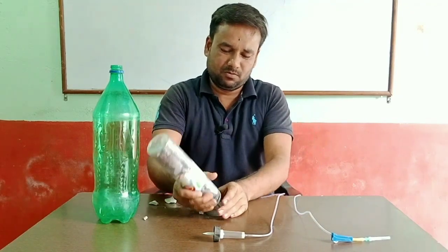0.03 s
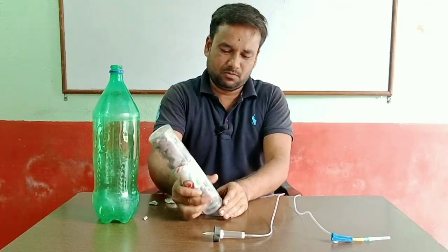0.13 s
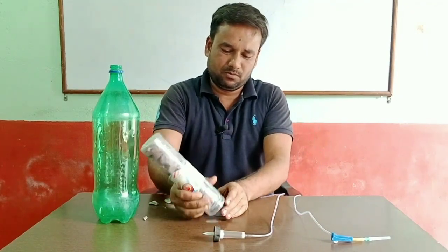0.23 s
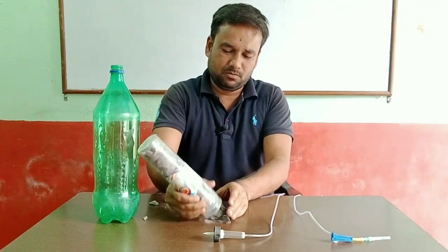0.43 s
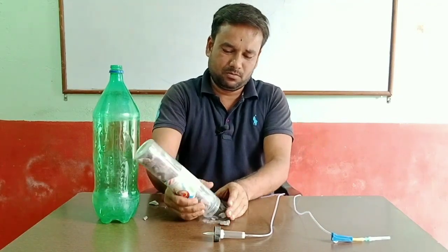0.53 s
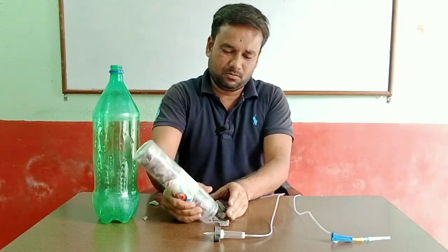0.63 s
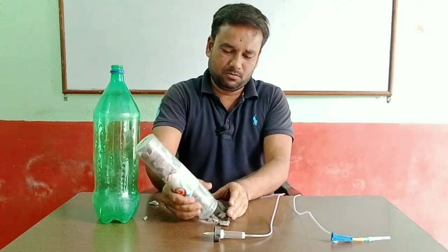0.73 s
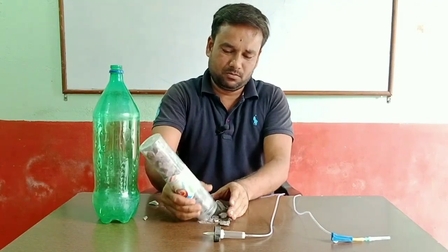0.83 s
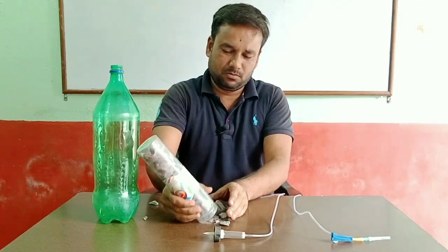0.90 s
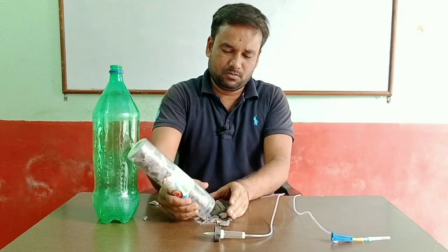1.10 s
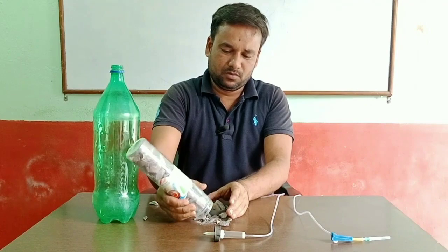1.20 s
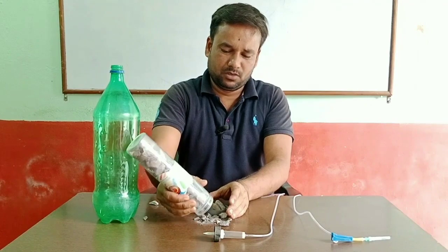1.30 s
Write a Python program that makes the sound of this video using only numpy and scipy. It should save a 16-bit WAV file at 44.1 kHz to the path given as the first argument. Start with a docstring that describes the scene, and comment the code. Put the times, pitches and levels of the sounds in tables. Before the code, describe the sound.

Stones clatter out of a plastic jar onto a wooden table. Grit scrapes softly until 0.15 s with small clicks. Hard woody knocks start at 0.22 s, cluster at 0.34-0.45 s, and strike again around 0.52 and 0.65 s amid bright stone clicks and rolling. Lighter knocks follow at 0.8-0.98 s, then faint plastic squeaks near 1.03-1.08 s and trickling crumbs fade into quiet room hum with short echoes.

```python
"""Hard stone lumps shaken out of a tilted plastic jar knock a wooden table, modelled as sharp blows
with damped table modes and bursts of dense modes, and click together as short pitched noise.
Grit slides along the jar wall and small stones tick and roll: random impulses, filtered.
The rattle thins over a faint trickle of crumbs; noise bands and rim modes squeak near the end.
A bare room adds echoes and a short tail; a low table mode hums on over quiet room noise."""
import sys
import numpy as np
from scipy import signal
from scipy.fft import rfft, irfft, next_fast_len
from scipy.io import wavfile

SR = 44100
rng = np.random.default_rng(int(sys.argv[2]) if len(sys.argv) > 2 else 0)


def generate_wav(sig):
    """Save sig (samples, or channels by samples) to the path in sys.argv[1] as 16-bit PCM at SR."""
    pcm = np.round(np.clip(np.atleast_2d(sig).T, -1, 1) * 32767).astype(np.int16)
    wavfile.write(sys.argv[1], SR, pcm)


N = 59535  # length in samples


def amp(db):
    """Decibels to amplitude ratio: 20 dB per factor of ten."""
    return 10 ** (np.asarray(db) / 20)


def unit(x):
    """Normalization to an RMS of 1."""
    return x / np.sqrt(np.mean(x ** 2) + 1e-20)


def along(points, hz):
    """Linear interpolation of (Hz, value) points over logarithmic frequency."""
    point_hz, value = np.transpose(points)
    return np.interp(np.log(hz + 1), np.log(point_hz + 1), value)


def curves(rows):
    """Piecewise-linear time courses, one per column after the time; end values are held."""
    time_s, *columns = np.transpose(rows)
    return [np.interp(np.arange(N) / SR, time_s, column) for column in columns]


def ring_time():
    """Time axis of one blow, in seconds from contact."""
    return np.arange(N) / SR


def add(track, start_s, x):
    """Superposition: mix x into the track from start_s."""
    start = max(0, round(start_s * SR))
    track[start:start + len(x)] += x[:max(0, N - start)]


def colour(x, spectrum, size=4096):
    """Minimum-phase filtering: folding the cepstrum makes the response causal."""
    level_db = along(spectrum, np.fft.rfftfreq(size, 1 / SR))
    cepstrum = irfft(np.log(amp(level_db)))
    cepstrum[1:size // 2] *= 2
    cepstrum[size // 2 + 1:] = 0
    response = irfft(np.exp(rfft(cepstrum)))
    return signal.fftconvolve(x, response)[:len(x)]


def fade(t, t60):
    """Exponential damping: a fall of 60 dB in t60 seconds."""
    return np.exp(-np.log(1000) * t / t60)


def burst(spectrum, t60):
    """High modal density: overlapping modes act as decaying coloured noise of initial level about 1."""
    envelope = fade(ring_time(), t60)
    noise = colour(envelope * rng.standard_normal(len(envelope)), spectrum)
    return unit(noise) * np.sqrt(np.mean(envelope ** 2))


def ring(modes, scatter_db):
    """Modal superposition: damped sines whose levels vary randomly from blow to blow."""
    t = ring_time()
    out = np.zeros(N)
    for hz, db, t60 in modes:
        level = amp(db + scatter_db * rng.standard_normal())
        out += level * fade(t, t60) * np.sin(2 * np.pi * hz * t)
    return out


def contacts(per_s, scatter_db):
    """Random point process: sparse impulses of either sign and uneven size."""
    happens = rng.random(N) < per_s / SR
    size = amp(scatter_db * np.minimum(rng.exponential(size=N), 4))
    return happens * size * np.sign(rng.standard_normal(N))


def in_room(x, count=10):
    """Room impulse response: direct sound, early wall echoes and a frequency-dependent diffuse tail."""
    # Reverberation time of the room: hz, t60_s
    room_decay = [(80, .6), (310, 0.58), (450, 0.37), (700, 0.42), (1000, 0.39), (1600, 0.31), (2400, 0.33),
                  (4000, 0.29), (7500, 0.27), (12000, 0.34)]
    tail_db, walls_db, build_up_s = -10, -12, 0.014
    hz, t, z = signal.stft(rng.standard_normal(SR // 2), SR, nperseg=256)
    decay = fade(t, along(room_decay, hz)[:, None])
    tail = signal.istft(z * decay, SR, nperseg=256)[1]
    tail *= 1 - np.exp(-np.arange(len(tail)) / SR / build_up_s)  # the tail swells in
    answer = amp(tail_db) * tail / np.linalg.norm(tail)
    echo_s = rng.uniform(.003, .03, count)
    answer[(echo_s * SR).astype(int)] += amp(walls_db) / np.sqrt(count)
    answer[0] = 1  # direct sound
    return signal.fftconvolve(x, answer)[:N]


def slide():
    """Stick-slip friction: grit scrapes down the thin jar wall in a dense run of slips."""
    # Course of the scrape before the room: time_s, level_db
    scrape = [(0, -51.5), (.02, -49), (.05, -51.5), (.075, -46.5), (.1, -58.5), (.13, -71), (.16, -74),
              (.2, -97)]
    # Colour of the scrape: hz, level_db
    grit_spectrum = [(100, -22.5), (1150, -24.5), (1550, 1), (2600, -7), (3700, 4), (5000, -3.5),
                     (7000, 0.5), (9000, -19), (12000, -25.5), (15500, -42)]
    level_db, = curves(scrape)
    slips = contacts(3200, scatter_db=5)
    return in_room(amp(level_db) * unit(colour(slips, grit_spectrum)))


def settle():
    """Dense micro-impacts: crumbs trickle faintly throughout and finally come to rest."""
    # Course of the trickle, steady before the first row: time_s, level_db
    trickle = [(1.0, -61), (1.07, -71.5), (1.13, -65.5), (1.19, -70.5), (1.235, -72.5), (1.27, -98.5),
               (1.34, -96.5)]
    # Colour of the trickle: hz, level_db
    crumb_spectrum = [(300, -41), (1400, -18), (2400, -27.5), (3400, 1.5), (5500, -0.5), (7500, 4.5),
                      (9500, -5.5), (12000, -21), (15500, -23)]
    level_db, = curves(trickle)
    impacts = contacts(2500, scatter_db=7)
    return in_room(amp(level_db) * unit(colour(impacts, crumb_spectrum)))


def room_noise():
    """Stationary filtered noise: the quiet background of the room."""
    # Colour of the background: hz, level_db
    floor_spectrum = [(25, -16.5), (70, 2), (110, 17), (170, -16), (300, 6), (600, -10), (1400, -12),
                      (2400, -27.5), (8000, -30), (15000, -30.5)]
    noise = colour(rng.standard_normal(N), floor_spectrum)
    return amp(-80) * unit(noise)


def tumble(size=1024):
    """Granular impact noise: small stones tick together and roll on the table as the flow changes."""
    # Flow of tumbling stones before the room: time_s, rattle_db, roll_db
    flow = [(.17, -70, -100), (.21, -56.5, -75), (.25, -48.5, -54.5), (.33, -56.5, -49.5), (.39, -41, -40),
            (.48, -48.5, -46), (.57, -44, -45), (.63, -51.5, -52.5), (.68, -55, -44.5), (.76, -52.5, -52.5),
            (.85, -47, -42.5), (.915, -57, -58), (.97, -57.5, -49), (1.04, -63, -63), (1.10, -61, -81),
            (1.17, -106, -87.5)]
    # Colours of rattle and rolling: hz, level_db
    chatter_spectrum = [(500, -21.5), (1500, -15.5), (2300, -3.5), (3300, 6.5), (3900, 6), (4700, -0.5),
                        (5500, 3.5), (6100, -4), (7300, 4.5), (9500, -14.5), (12000, -27), (15500, -38.5)]
    roll_spectrum = [(40, -34), (150, -1.5), (325, 0.5), (450, -9), (570, 7), (750, -1.5), (1100, 1),
                     (1700, 3), (2300, -8), (5000, -41)]
    grains_per_s, grain_hz, grain_spread = 900, 4860, 0.46  # median pitch; spread in log pitch
    grain_t60, grain_scatter_db = 0.024, 1.5  # seconds; dB per natural-log unit of strength
    chatter_per_s, chatter_scatter_db, ringing_db = 420, 4.5, -9  # ringing relative to impulses
    rattle_db, roll_db = curves(flow)

    # Short decaying cosines at random times
    when, pitch, strength = rng.random((int(grains_per_s * N / SR), 3)).T
    hz = grain_hz * (pitch / (1 - pitch)) ** (grain_spread / 2)  # log-logistic pitches
    hz = np.clip(hz, 1000, SR / 3)
    t = np.arange(size) / SR
    level = amp(-grain_scatter_db * np.log(strength + 0.03))
    grains = level[:, None] * fade(t, grain_t60) * np.cos(2 * np.pi * hz[:, None] * t)
    places = (when * N).astype(int)[:, None] + np.arange(size)
    ticks = np.bincount(places.ravel(), grains.ravel(), N)[:N]

    chatter = unit(contacts(chatter_per_s, scatter_db=chatter_scatter_db))
    mixed = chatter + amp(ringing_db) * unit(ticks)
    rattle = amp(rattle_db) * unit(colour(mixed, chatter_spectrum))
    roll = amp(roll_db) * unit(colour(contacts(700, scatter_db=0.5), roll_spectrum))
    return in_room(rattle + roll)


def clicks():
    """Hard elastic impact: two stones meet in a sharp crack and a very short ring around one pitch."""
    # Stone against stone, levels before the common gain: start_s, level_db, pitch_hz
    collisions = [(0.013, -52, 6820), (0.0614, -40.5, 3740), (0.0687, -37, 5550), (.081, -35.5, 6950),
                  (0.2171, -40, 3360), (0.2989, -35.5, 6020), (0.3583, -25, 5740), (0.392, -33.5, 5600),
                  (.402, -26, 3720), (.417, -39, 6950), (0.4327, -52, 6090), (.447, -22.5, 5720),
                  (0.4486, -28.5, 4290), (.463, -35, 7000), (0.487, -34, 5130), (.526, -24.5, 3960),
                  (.550, -39, 7000), (0.56, -49, 4200), (0.5703, -33, 3930), (0.5903, -36, 5000),
                  (0.6, -32.5, 3810), (.620, -37.5, 6800), (.645, -24, 3800), (0.6455, -17.5, 5810),
                  (.6675, -32, 3680), (.6935, -24.5, 3305), (.714, -36, 5800), (0.756, -39.5, 5550),
                  (0.798, -35.5, 3150), (0.849, -38.5, 5800), (0.865, -52, 5280), (0.94, -34.5, 3920),
                  (0.9451, -38, 3770), (0.951, -34, 3290), (1.009, -39.5, 3840), (1.036, -45, 3700),
                  (1.084, -49, 4830), (1.1581, -52.5, 4200), (1.2848, -58.5, 5910), (1.289, -60.5, 6000)]
    # Colour of the stones: hz, level_db
    stone_spectrum = [(300, -39.5), (900, -14), (1500, 4.5), (2300, -6.5), (3500, -3), (7400, -5),
                      (9500, -9), (12000, -31), (15500, -39.5)]
    ring_t60, crack_t60 = 0.015, 0.0016  # seconds
    gain_db, crack_db = 3, -6  # crack relative to ring
    out = np.zeros(N)
    for start_s, db, hz in collisions:
        # The repeated pitch makes a 9 dB step down above it
        band = [(hz / 3, -26), (hz / 1.22, -9), (hz, 0), (hz, -9), (hz * 3, -24)]
        tone = burst(band, ring_t60)
        crack = burst([(1000, 2.5), (8000, 4.5), (14000, -18)], crack_t60)
        click = colour(tone + amp(crack_db) * crack, stone_spectrum)
        add(out, start_s, in_room(amp(db + gain_db) * click))
    return out


def knocks():
    """Impact excitation: a landing lump strikes a blow, thumps and raps the table, and clacks itself."""
    # Lumps landing, levels before the part gains: start_s, thump_db, rap_db, clack_db
    landings = [(0.2233, -21, -29.5, -44.5), (0.2259, -65, -27.5, -33), (0.3424, -27, -34.5, -36),
                (0.3563, -22, -21, -27.5), (.372, -58, -33.5, -44), (0.415, -33, -36, -40),
                (.426, -33, -38.5, -41), (0.5182, -35, -29, -30), (0.5234, -27.5, -28.5, -32.5),
                (.642, -25.5, -23.5, -29.5), (.656, -31, -55, -36.5), (.786, -43, -40.5, -58),
                (.813, -27, -30, -30), (.830, -35, -34, -42), (.858, -36.5, -50.5, -37.5),
                (0.976, -43, -38.5, -39.5)]
    # Low modes of the table top: hz, level_db, t60_s
    table_modes = [(72.7, -21.5, 2.3), (94.6, -4, .1), (129.8, -21.5, 1), (189, -7, 0.44), (251, -23, 0.24),
                   (317, -3.5, .22), (330.4, -1.5, 0.33), (436.6, -10.5, .1), (565, -8, 0.19),
                   (695, -19, 0.15)]
    # Its stiff upper modes, struck by hard contact: hz, level_db, t60_s
    panel_modes = [(897, -11.5, 0.11), (986.6, -2.5, 0.063), (1089, 1.5, 0.055), (1210, -17, 0.025),
                   (1372, -9.5, 0.06), (1540, -11.5, 0.11), (1682, -9.5, .08)]
    # Colours of the first sharp contact, thump, rap and clack: hz, level_db
    blow_spectrum = [(40, -26.5), (120, -4.5), (400, 6), (1100, -9.5), (1700, -14), (2300, -7.5),
                     (4000, -2.5), (7500, -21), (11000, -49), (15000, -62)]
    thump_spectrum = [(30, -32.5), (60, -6.5), (100, 1.5), (350, 5), (600, -7.5), (1200, -21), (3000, -68)]
    rap_spectrum = [(150, -17), (500, -5.5), (1100, 3), (1700, 0.5), (2200, -15), (5000, -47.5)]
    clack_spectrum = [(500, -20), (2200, -4), (2700, -3), (3500, 8.5), (4600, 0), (5500, -3.5), (7400, 0.5),
                      (9500, -15), (12000, -32), (15500, -42.5)]
    thump_t60, rap_t60, clack_t60 = 0.074, 0.046, 0.049  # seconds
    # Part gains; blow_db sets the blow's peak over the rap level
    table_db, thump_gain_db, panel_db, rap_gain_db, blow_db = -7, -6, -6, -3, 2
    out = np.zeros(N)
    blow = colour(signal.unit_impulse(N), blow_spectrum)
    blow *= amp(blow_db) / np.abs(blow).max()
    for start_s, thump_db, rap_db, clack_db in landings:
        thump = amp(thump_gain_db) * burst(thump_spectrum, thump_t60)
        panel = amp(panel_db) * ring(panel_modes, scatter_db=3.5)
        rap = blow + panel + amp(rap_gain_db) * burst(rap_spectrum, rap_t60)
        clack = burst(clack_spectrum, clack_t60)
        hit = amp(thump_db) * thump + amp(rap_db) * rap + amp(clack_db) * clack
        add(out, start_s, in_room(hit))
        # The low modes are added without the room
        add(out, start_s, amp(thump_db + table_db) * ring(table_modes, scatter_db=1))
    return out


def squeaks():
    """Frictional excitation: stone rubs plastic in brief rough noise bands and sets the rim ringing."""
    # A stone rubs the plastic rim: start_s, level_db, pitch_hz
    rubs = [(1.028, -51, 1960), (1.083, -53, 1480)]
    # Modes of the jar's rim: hz, level_db, t60_s
    rim_modes = [(883, -7, 0.13), (1329, -2, 0.062), (1393, -1, 0.044)]
    attack_s, squeak_t60 = 0.0009, 0.073  # seconds
    edge = 1 + .22  # band edge as a ratio to the pitch
    out = np.zeros(N)
    for start_s, db, hz in rubs:
        band = [(hz / 2, -35), (hz / edge, -16), (hz, 0), (hz * edge, -16), (hz * 2, -35), (hz * 6, -56)]
        onset = 1 - np.exp(-ring_time() / attack_s)
        tone = onset * burst(band, squeak_t60)
        squeak = tone + ring(rim_modes, scatter_db=5)
        add(out, start_s, in_room(amp(db) * squeak))
    return out


def scene():
    """Linear superposition of all sources at one microphone."""
    jar_and_room = slide() + settle() + room_noise()
    stones = tumble() + clicks() + knocks() + squeaks()
    return (jar_and_room + stones)[None]


def record(dry):
    """Band limitation: the deepest bass rolls off and nothing passes above the upper limit."""
    low_cut_hz, top_hz = 79.5, 15780
    high_pass = signal.butter(3, low_cut_hz, "highpass", fs=SR, output="sos")
    thin = signal.sosfilt(high_pass, dry)
    size = next_fast_len(N + SR // 2)  # zero padding
    passed = np.fft.rfftfreq(size, 1 / SR) < top_hz
    return irfft(rfft(thin, size) * passed, size)[..., :N]


dry = scene()
out = record(dry)
generate_wav(out)
```